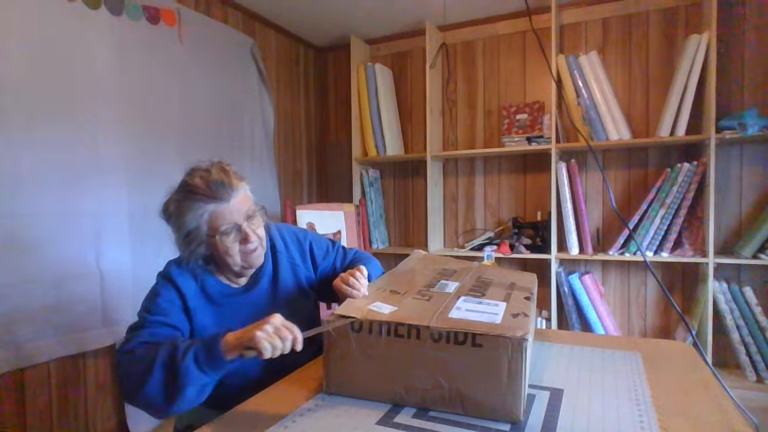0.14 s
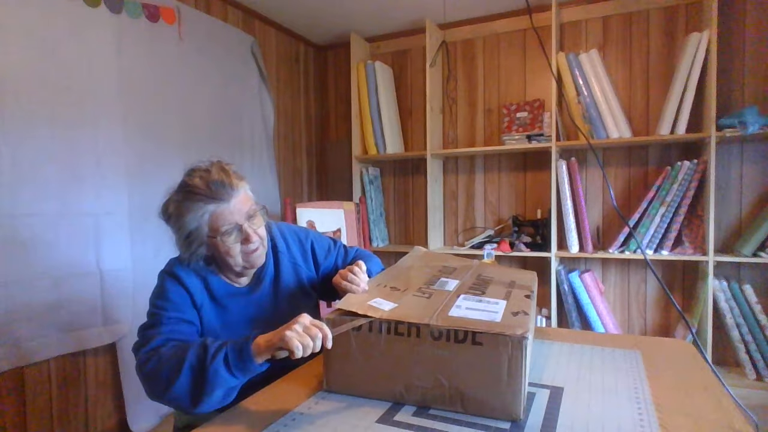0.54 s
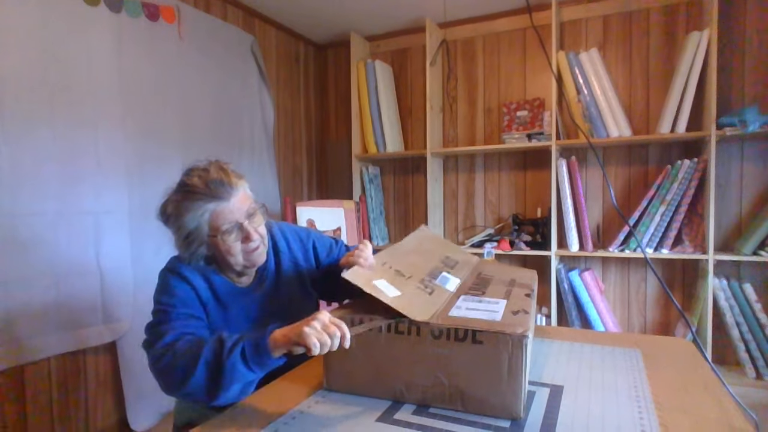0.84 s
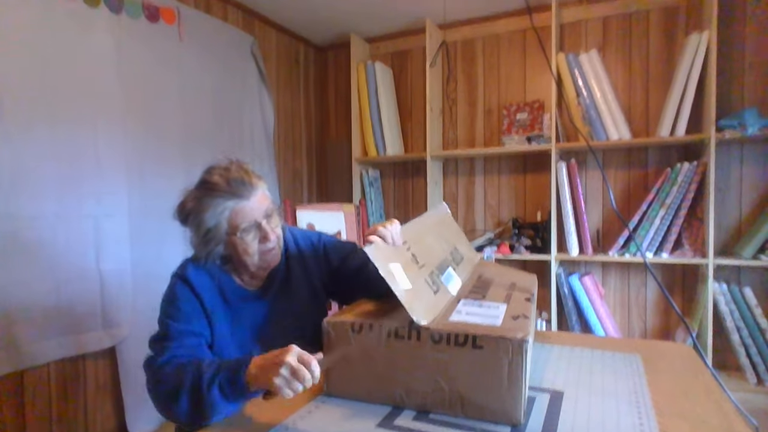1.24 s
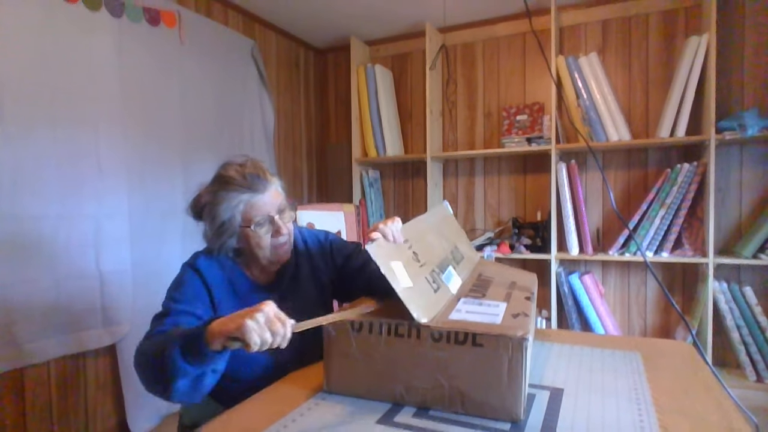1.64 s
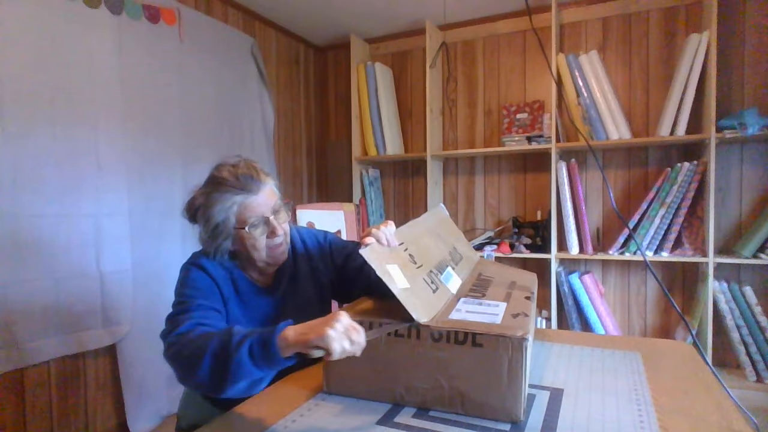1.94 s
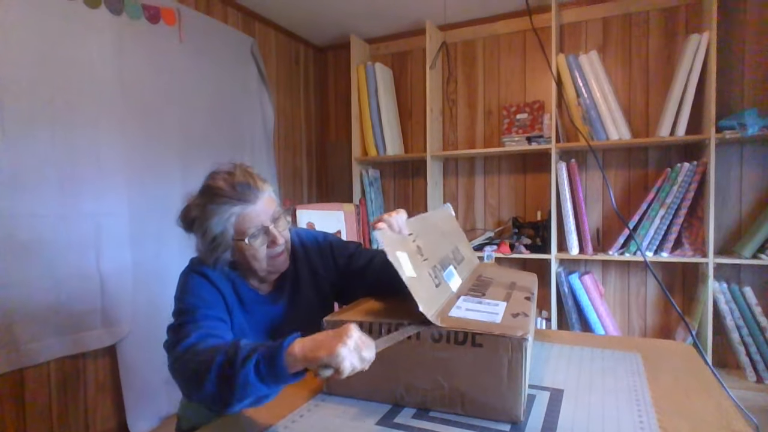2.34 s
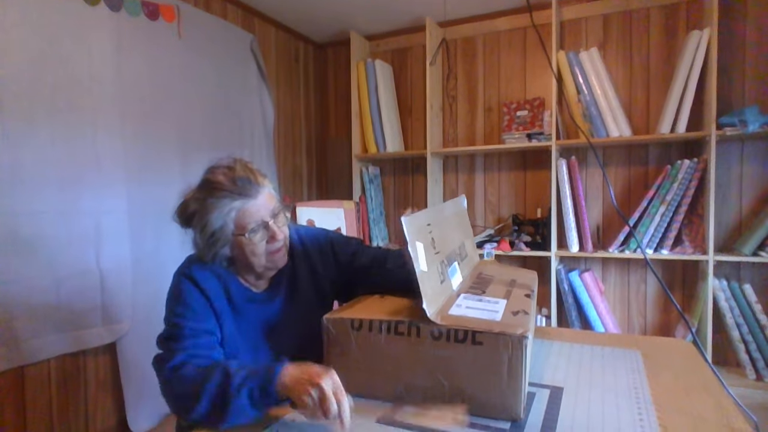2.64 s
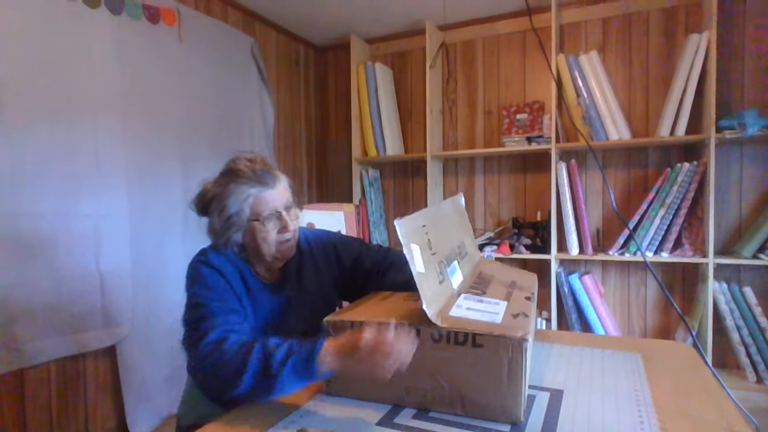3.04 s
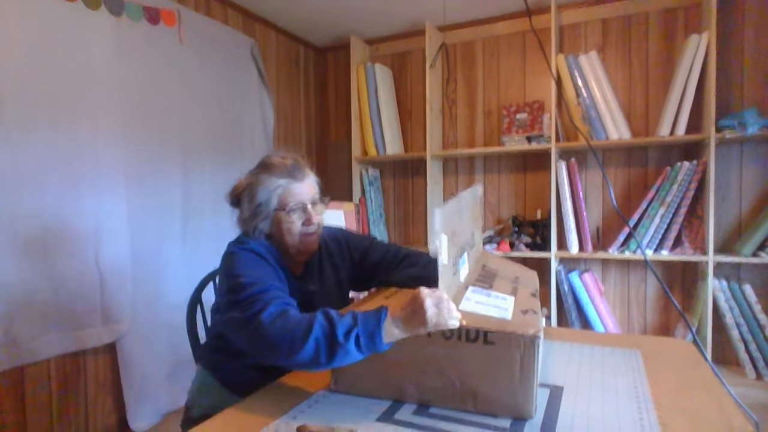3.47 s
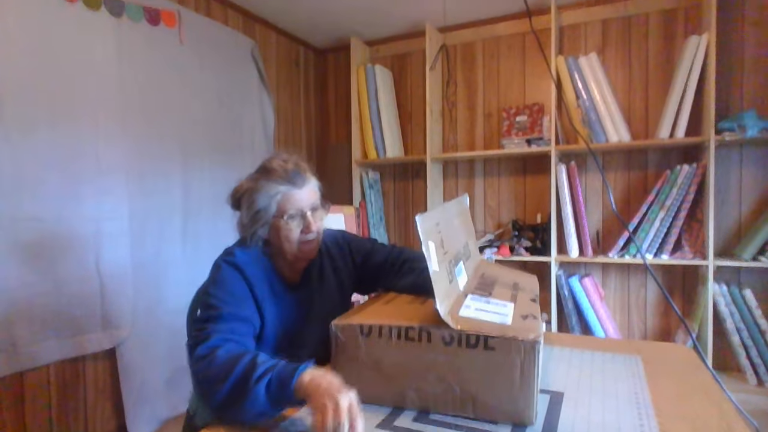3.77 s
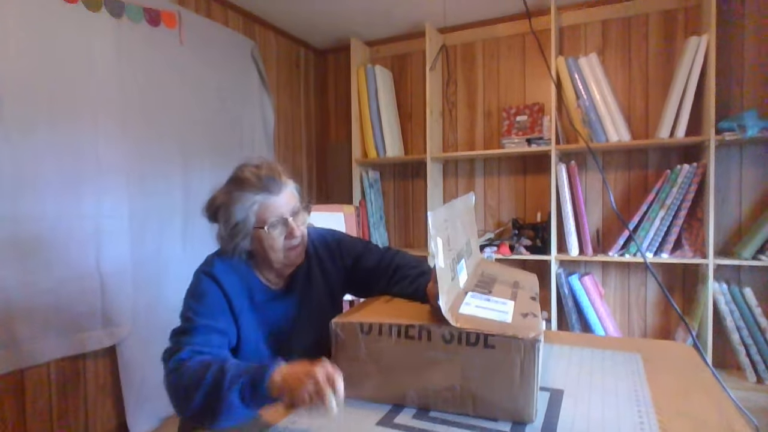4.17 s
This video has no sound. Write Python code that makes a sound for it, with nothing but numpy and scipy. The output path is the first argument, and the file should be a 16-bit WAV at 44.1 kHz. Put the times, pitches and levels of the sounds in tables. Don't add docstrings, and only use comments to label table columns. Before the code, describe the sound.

Close stereo microphones on a desk in a small panelled room. A blade rasps under tape on a hollow cardboard box, with fibres snapping most densely around one second. After a quieter spell the flap slaps loose just past two seconds. A sleeve brushes the desk, a knife drops and bounces with a brief metallic ring, then cloth and cardboard rub to the end.

```python
import sys
import numpy as np
from scipy import signal
from scipy.fft import rfft, irfft
from scipy.io import wavfile
from scipy.ndimage import uniform_filter1d

SR = 44100
rng = np.random.default_rng(int(sys.argv[2]) if len(sys.argv) > 2 else 0)


def waveform_to_disk(signal):
    frames = np.transpose(np.atleast_2d(signal))
    scaled = np.clip(frames, -1, 1) * 32767
    samples = np.round(scaled).astype(np.int16)
    wavfile.write(sys.argv[1], SR, samples)


def gain_from_decibels(decibels):
    exponent = np.asarray(decibels, float) / 20
    return 10 ** exponent


N = 189833

# frequency [Hz], density [dB per Hz].
AIR_COLOUR = [(59, 9), (100, -0.5), (437, 1), (600, -25), (1200, -22), (2920, -14), (15900, -12.5),
              (16500, -26)]
# frequency [Hz], likeness [-1 to 1].
LIKENESS = [(60, 0.99), (150, 0.86), (380, 1), (600, 0.92), (950, 0.9), (2380, 0.41), (5980, 0.65),
            (15000, 0.42)]
# frequency [Hz], lead [radians].
LEFT_LEAD = [(0, 0.96), (5510, 0), (6890, 1.06), (10400, 1.3), (12200, 1.6), (16300, 0.78), (16500, 0)]
# frequency [Hz], t60 [s].
ROOM_T60 = [(100, 0.57), (500, 0.4), (1500, 0.46), (4000, 0.31), (12000, 0.17)]
# time [s], swing [full scale], rate [Hz].
ROCKING = [(0, .012, 6.1), (.6, .008, 6.15), (1, .022, 6.15), (1.25, .036, 5.85), (1.8, .02, 5.85),
           (2.1, .003, 5.4), (2.45, .005, 5.3), (2.75, .016, 5.55), (3.1, .006, 5.55), (3.6, .026, 5.6),
           (4, .036, 5.65), (4.31, .012, 4.9)]
# frequency [Hz], density [dB per Hz].
RUMBLE_COLOUR = [(7.1, -19), (12, 4), (19, 1.5), (33, -8), (55, -1.5), (81, -62), (140, -10.5), (290, -120)]
# start [s], level [dB].
JOLTS = [
    (0.0, -43.5),
    (.72, -43),
    (2.17, -50),
    (2.76, -33.5),
    (3.52, -46.5),
    (3.88, -46),
]

# frequency [Hz], level [dB], t60 [s].
PANELS = [(130.3, -16, 0.95), (225, -23, 0.08), (334, -13, 0.86), (440, -30, 0.49), (498, -41, 0.37),
          (615, -49, 0.16), (815, -30, 0.25), (840, -42, 0.85), (980, -42, 0.35), (1350, -26, 0.61),
          (1610, -27, 0.3), (1616, 6.5, 0.16)]
# start [s], peak [dB], main ring [Hz], hardness [1], t60 [s].
KNOCKS = [(.281, -32, 153, 0.79, 0.29), (0.361, -31, 313, 0.74, 0.17), (.388, -23.5, 562, 0.9, 0.15),
          (.405, -27, 197, 0.61, 0.15), (0.434, -28.5, 480, 0.56, 0.12), (0.661, -42, 493, 0.46, .06),
          (.706, -23, 498, 0.7, 0.23), (0.7359, -21, 438, 1.24, 0.19), (.762, -32, 430, .6, 0.11),
          (.795, -28.5, 403, 0.68, 0.11), (1.09, -31, 454, 1.66, 0.18), (1.3667, -28, 478, 0.93, 0.091),
          (1.367, -29, 162, 0.28, 0.24), (1.376, -28, 198, 0.1, 0.16), (1.555, -43, 420, 1, 0.074),
          (1.596, -31.5, 720, 0.81, 0.062), (1.872, -33.5, 147, 0.49, 0.2),
          (1.873, -35.5, 482, 0.61, 0.099), (2.1786, -12, 478, 0.6, 0.09), (2.184, -22, 136, 0.7, 0.077),
          (2.7696, -23, 328, 0.85, 0.045), (2.772, -29.5, 146, 0.49, 0.2), (2.794, -27, 200, .5, 0.079),
          (2.834, -41, 290, 0.49, 0.059), (2.909, -11, 553, 1.2, 0.029), (2.915, -19, 980, 1.201, 0.18),
          (2.938, -14, 670, 1.52, 0.11), (2.951, -18, 720, 0.83, 0.21), (2.967, -20.5, 980, 1.1, 0.17),
          (2.989, -22, 334, 0.93, 0.23), (3.016, -24, 748, 0.6, 0.22), (3.33, -40, 206, 0.38, 0.13),
          (3.245, -38.5, 450, 0.47, 0.098), (3.66, -45, 303, 0.42, 0.12), (3.866, -26, 130.6, 0.61, 0.18),
          (3.868, -21, 480, 0.5, 0.07)]
# frequency [Hz], level [dB], t60 [s].
FLAP_MODES = [(215.5, -2.5, 0.24), (421.6, -11.5, 0.27), (713, -13, 0.13), (1094, -6.5, 0.17),
              (1385, -7, 0.12), (1917, -4.5, 0.12), (2520, -3.5, 0.13), (474, -10, 0.25), (3180, -13, 0.18),
              (1740, -13.5, 0.16), (2708, -19, 0.2)]
# start [s], peak [dB], length of push [s].
SLAPS = [
    (2.17875, 0, .00005),
    (2.1792, -2, .00008),
    (2.1856, -11, .0001),
    (2.9395, -13, .00012),
    (2.9517, -11, .00012),
]

# frequency [Hz], level [dB], t60 [s].
DESK_MODES = [(212, -11, 0.13), (134.3, -9, 0.15), (478, -6, 0.18), (650, 0, 0.17), (720, -2, 0.2),
              (758, -5, 0.2), (851, -5, 0.22), (979, -1.5, 0.22), (1106, -7, 0.2), (1224, -4, 0.21),
              (1323, -4, 0.1), (1620, -2, 0.13), (1737, -7.5, 0.1), (2040, -14, 0.083)]
# start [s], level [dB].
LANDINGS = [
    (2.9105, -30),
    (2.939, -28.5),
    (2.952, -27),
    (2.968, -29),
    (2.99, -31),
    (3.017, -39.5),
    (3.069, -44),
    (3.088, -46.5),
]
# start [s], clack peak [dB], high ring [dB], low rings [dB].
BOUNCES = [(2.9102, -1.5, -40, -40), (2.916, -12, -40, -40), (2.9393, -12, -49, -17),
           (2.9515, -12.5, -39, -40), (2.9892, -10, -22, -28), (2.9938, -16, -18, -20),
           (3.0102, -31, 4, -24), (3.069, -23, -25, -16), (3.087, -21.5, -14, -2), (3.1156, -32, -25, -2),
           (3.134, -25, -31, -12), (3.15, -33, -17, -14)]
# frequency [Hz], level [dB], t60 [s].
BLADE_MODES = [(12200, -11, .11), (12270, -16, .08), (5410, -14, .11), (5480, -16, .09), (3634, -11, .025),
               (8900, -20, .04), (7300, -24, .05)]

# frequency [Hz], density [dB per Hz].
HISS_COLOUR = [(2060, -48), (3500, -9.5), (4780, -7), (7250, -3.5), (9660, -4.5), (12900, -3.5),
               (15500, -4.5)]
# frequency [Hz], density [dB per Hz].
RASP_COLOUR = [(1060, -12), (1800, -2), (2890, -1), (3790, -2.5), (5000, -2.5), (6500, -9.5), (11000, -120)]
# frequency [Hz], density [dB per Hz].
BOARD_COLOUR = [(260, -44), (450, -1.5), (531, -5), (740, -2), (2200, -6.5), (2860, -17), (4840, -120)]
# frequency [Hz], density [dB per Hz].
HOLLOW_COLOUR = [(53, -89), (90, -16), (140, -10.5), (388, -11.5), (435, -2.5), (560, -16.5), (730, -52),
                 (1230, -120)]
# time [s], grittiness [0-1].
GRITTINESS = [(0, 0.38), (.35, 0.35), (.45, 0.07), (.72, 0.75), (.8, 0.1), (.95, 0.47), (1.05, 0.4),
              (1.12, 0.07), (1.9, 0.21), (2.4, 0.7), (2.47, 0.7), (2.56, 0.13), (2.7, 0.06), (3.3, 0.37),
              (3.45, 0.5), (3.6, 0.01), (4.31, 0.49)]
# time [s], depth [0-1].
ECHO_DEPTH = [(0, .3), (.05, .5), (.28, .45), (.36, .15), (.7, .2), (.9, .25), (.96, .45), (1.09, .5),
              (1.14, .1), (2.1, .1), (2.43, .3), (2.55, 0), (3.3, .1), (3.45, .25), (3.6, 0), (4.31, .1)]
# start [s], fullest [s], end [s], hiss [dB], rasp over hiss [dB].
CUTS = [(-.05, .06, 0.27, -42.5, -11), (0, .22, 0.5, -39.5, -12.5), (.4, .47, 0.55, -48, -2),
        (.36, .42, 0.49, -35.5, -4), (.58, .69, .72, -52.5, -3.5), (.69, .743, 0.92, -29, -7),
        (.88, .95, 1.03, -31, -9), (.92, 1.065, 1.125, -30, -3), (1.08, 1.18, 1.47, -44, -8),
        (1.225, 1.24, 1.29, -50.5, 7.5), (1.28, 1.31, 1.43, -48, -18), (1.42, 1.5, 1.66, -61, -3),
        (1.55, 1.592, 1.632, -45.5, -8.5), (1.86, 1.92, 1.955, -44, -12), (1.95, 2.03, 2.17, -46, -7.5),
        (2.146, 2.149, 2.156, -41, -15), (2.168, 2.173, 2.178, -39, -20), (.855, .858, .862, -40, -10),
        (2.354, 2.357, 2.47, -49, -5), (2.36, 2.46, 2.56, -42, -3.5)]
# start [s], fullest [s], end [s], hiss [dB], rasp over hiss [dB].
SWEEPS = [
    (2.468, 2.756, 3.08, -28.5, -13),
    (3.002, 3.144, 3.33, -49, -6.5),
    (3.226, 3.28, 3.36, -38, -10),
    (3.23, 3.436, 3.63, -32.5, -10),
    (3.569, 3.578, 3.674, -37, -9),
    (3.62, 3.86, 4.071, -30, -6.5),
    (3.94, 4.12, 4.594, -44.5, -11),
    (4.243, 4.274, 4.36, -45, -18),
]
# start [s], fullest [s], end [s], board [dB], hollow over board [dB].
SHOVES = [(-.01, .05, 0.32, -49.5, 5.5), (.08, .3, 0.56, -46.5, 7.5), (.37, .43, 0.53, -41.5, 7),
          (.62, .7, 0.73, -51, 8.5), (.69, .735, 0.89, -43.5, 6), (.95, 1.07, 1.14, -37.5, -35),
          (1.15, 1.3, 1.35, -54, 5), (1.54, 1.6, 1.735, -57, 9.5), (1.95, 2.01, 2.15, -59, -3),
          (2.36, 2.47, 2.7, -54.5, 8), (3.0, 3.08, 3.24, -43, 5), (1.365, 1.39, 1.5, -51, 0),
          (3.2, 3.26, 3.32, -55, 14), (3.28, 3.47, 3.683, -44.5, 7), (3.66, 3.74, 3.83, -46.5, 5.5),
          (3.88, 3.97, 4.05, -45, 7), (4.05, 4.15, 4.4, -62.5, 9.5)]
# start [s], tape [dB], board [dB], hollow over board [dB], t60 [s].
SHIVERS = [(0.387, -32, -45, 10, 0.064), (1.367, -53, -51, -0.5, 0.11), (1.87, -42.5, -59, 20.5, 0.17),
           (1.948, -36, -40.5, 3, 0.22), (2.144, -43, -46.5, -14, 0.094), (2.182, -26, -39, 5, 0.14),
           (2.773, -36.5, -41, 11.5, 0.19), (2.915, -19.5, -31, 1, 0.031), (2.937, -27.5, -20.5, -5, 0.094),
           (2.987, -32, -31, 6, 0.096), (3.865, -32.5, -53, 18, 0.17)]
# fullest [s], rise [s], fall [s], level [dB], pitch [Hz].
WHISTLES = [(3.45, .1, .07, -36, 7400), (3.41, .08, .07, -42, 5150), (2.452, .03, .023, -56, 2700),
            (2.44, 0.022, .03, -50, 4900), (2.485, .015, .035, -43, 6800), (1.885, 0.018, 0.13, -50, 3170),
            (1.875, .01, 0.032, -47.5, 6400), (1.506, .012, .013, -59, 3900),
            (1.462, .012, .03, -57, 12500), (1.312, .02, .02, -48, 12500), (3.59, 0.023, .03, -43.5, 6000),
            (2.76, .12, .08, -40, 3000), (2.2, 0.13, .07, -57, 1130), (2.84, .04, .03, -46, 3300),
            (1.06, .06, .04, -34.5, 2390), (1.055, .06, .04, -36.5, 3140), (.05, 0.027, .05, -52, 1020),
            (1.0, .04, 0.038, -40, 1630), (1.08, .05, .03, -39, 1160), (1.957, .007, .02, -45, 3900),
            (.17, .13, .15, -59.5, 3770), (3.98, 0.0087, .012, -41, 1640), (3.979, .008, 0.013, -36, 5400),
            (2.0, .04, .1, -52, 3120), (4.15, .05, .05, -56, 7000), (.6, .06, .05, -60, 1500)]

# start [s], peak [dB], main ring [Hz], share of wide crack
SNAPS = [(0.285, -25, 5100, 0.7), (.0145, -37, 9500, 0.5), (.391, -7, 4360, 0.6), (0.398, -21, 5560, 0.4),
         (.626, -32, 4000, 0.4), (0.6654, -21.5, 8600, 0.6), (.679, -29, 14000, .7),
         (.6995, -18, 7240, 0.65), (.707, -18, 4870, 0.68), (.737, -6, 12000, 0.7),
         (0.7533, -10, 5450, 0.45), (.758, -7, 12900, .5), (.794, -23, 7500, 0.8), (.8232, -6, 5000, 0.7),
         (0.8253, -12.5, 10000, .5), (0.8504, -4, 5800, 0.7), (.866, -12, 12640, 0.72),
         (.883, -18, 5600, 0.8), (0.8987, -9, 2640, 0.65), (0.9153, -16, 5960, .8),
         (0.9192, -7, 11030, 0.7), (0.986, -11, 12800, 0.49), (1.0456, -8, 2520, 0.6),
         (1.0764, -12, 2260, 0.35), (1.2354, -27, 2470, 0.62), (1.241, -22.5, 4440, 0.5),
         (1.3135, -23, 12300, 0.5), (1.322, -27, 12100, 0.4), (1.366, -28, 6000, 0.56),
         (1.5965, -22.5, 5060, 0.74), (1.875, -23, 8340, 0.4), (1.882, -19, 12000, 0.5),
         (1.887, -26, 9000, .7), (2.144, -13, 2310, 0.55), (2.1514, -24, 3240, 0.61),
         (2.157, -13, 12500, 0.7), (2.1648, -3.5, 7500, 0.55), (2.1786, -4, 3170, 0.7),
         (2.1844, -9, 3420, 0.6), (2.194, -18, 5000, 0.7), (2.22, -27, 4900, 0.65),
         (2.3563, -26, 13750, .85), (2.37, -25, 2650, 0.65), (2.375, -35, 5000, 0.48),
         (2.386, -31, 7960, .7), (2.391, -32, 13000, .6), (3.9804, -20, 4500, 0.33),
         (3.976, -23, 6580, 0.37), (4.1744, -25, 6602, 0.61), (4.231, -20, 7302, 0.53),
         (4.2368, -20, 13000, 0.59), (4.2436, -18.5, 5616, 0.6), (4.263, -21, 7400, 0.6)]


def evened(x):
    return x / np.sqrt(np.mean(x ** 2) + 1e-20)


def read(points, hz):
    f, value = np.transpose(points)
    return np.interp(np.log(hz + 1), np.log(f + 1), value)


def curves(rows):
    s, *columns = np.transpose(rows)
    return [np.interp(np.arange(N) / SR, s, column) for column in columns]


def add(mix, s, sound):
    part = mix[..., round(s * SR):][..., :sound.shape[-1]]
    part += sound[..., :part.shape[-1]]


def filtered(x, order, hz, kind="low"):
    return signal.lfilter(*signal.butter(order, hz, kind, fs=SR), x)


def ring(modes, t):
    return sum(gain_from_decibels(db - 60 * t / t60) * np.sin(2 * np.pi * hz * t) for hz, db, t60 in modes)


def noise(colour, patchy_db, size=512):
    frames, hz = N * 4 // size + 5, np.fft.rfftfreq(size, 1 / SR)
    a, b, c, d, patches = rng.standard_normal((frames, len(hz), 5)).T
    patches = uniform_filter1d(patches, size=7, axis=0)
    patches = evened(uniform_filter1d(patches, size=12, axis=1))
    same = np.clip(read(LIKENESS, hz), -1, 1)[:, None]
    left = a + 1j * b
    right = same * left + np.sqrt(1 - same ** 2) * (c + 1j * d)
    z = np.array([left * np.exp(1j * read(LEFT_LEAD, hz))[:, None], right])
    z *= gain_from_decibels(read(colour, hz)[:, None] + patchy_db * patches)
    return evened(signal.istft(z, nperseg=size, noverlap=size - size // 4)[1][:, :N])


def grit(per_s, spread_db, fade_s):
    size_db = spread_db * np.minimum(rng.exponential(1, N), 4)
    slips = gain_from_decibels(size_db) * (rng.random(N) < per_s / SR)
    return evened(signal.lfilter([1], [1, -np.exp(-1 / (fade_s * SR))], slips))


def strokes(rows):
    start, full, end, db, more_db = np.transpose(rows)[..., None]
    t = np.arange(0, N, 16) / SR
    away = np.where(t < full, (full - t) / (full - start), (t - full) / (end - full))
    swell = abs(np.cos(np.pi / 2 * np.clip(away, 0, 1))) ** 1.79
    power = (gain_from_decibels(db) * swell) ** 2
    return [np.repeat(p.sum(0), 16)[:N] for p in (power, power * gain_from_decibels(2 * more_db))]


def dying(s, db, t60, rise_s):
    s, db, t60 = (np.reshape(x, (-1, 1)) for x in (s, db, t60))
    since = np.maximum(np.arange(0, N, 16) / SR - s, 0)
    gain = (1 - np.exp(-since / rise_s)) * gain_from_decibels(db - 60 * since / t60)
    return np.repeat((gain ** 2).sum(0), 16)[:N]


def room_air():
    return gain_from_decibels(-57) * noise(AIR_COLOUR, 0.4)


def stand():
    swing, hz = curves(ROCKING)
    turns = np.cumsum(hz) / SR - np.array([[-.04], [.04]])
    rock = swing * (np.sin(2 * np.pi * turns) - 0.095 * np.cos(4 * np.pi * turns))
    s, db = np.transpose(JOLTS)
    calm_db = -50.5
    shake = np.sqrt(gain_from_decibels(2 * calm_db) + dying(s, db, t60=1.8, rise_s=0.019))
    return rock * gain_from_decibels([[-1.5], [0]]) + shake * noise(RUMBLE_COLOUR, 0.59, size=8192)


def room(x):
    taps = np.zeros((2, SR // 2))
    at = np.arange(150, SR // 2 - 20, 20) + rng.integers(0, 20, (2, (SR // 2 - 151) // 20))
    np.put_along_axis(taps, at, rng.choice([-1., 1.], at.shape), 1)
    hz, t, z = signal.stft(taps, SR, nperseg=256)
    apart = np.clip(hz / 800, 0, 1)[:, None]
    z[1] = np.sqrt(1 - apart ** 2) * z[0] + apart * z[1]
    tail = signal.istft(z * gain_from_decibels(-60 * t / read(ROOM_T60, hz)[:, None]), SR, nperseg=256)[1]
    return signal.fftconvolve(x.mean(0)[None], tail / np.linalg.norm(tail[0]), axes=1)[:, :N]


def desk_echo(x, depth):
    late = np.roll(x, round(.000385 * SR), axis=-1)
    late = .7 * late + .3 * np.roll(late, -1, axis=-1)
    return (x + depth * late) / np.sqrt(1 + depth ** 2)


def knocks():
    out, t = np.zeros(N), np.arange(16000) / SR
    draws = rng.standard_normal((len(KNOCKS), len(t) + len(PANELS)))
    for (s, db, hz, hard, t60), draw in zip(KNOCKS, draws):
        edge = np.clip(1000 * hard, 200, 9000)
        panels = []
        for (f, panel_db, panel_t60), chance in zip(PANELS, draw[len(t):]):
            level = panel_db - 6 * (f / edge) ** 3.6 + 0.32 * chance
            panels.append((f, level, min(panel_t60, 2.07 * t60) / (1 + f / 1500)))
        rattle = evened(filtered(draw[:len(t)], 2, [130, edge], "band")) * gain_from_decibels(-60 * t / t60)
        body = ring([(hz, -6.5 * hard, t60 / (1 + hz / 900))], t) + .5 * ring(panels, t)
        add(out, s, gain_from_decibels(db) * (1 - np.exp(-t / 0.0011)) * (body + 0.5 * rattle))
    return out


def flap_rap():
    out, t = np.zeros(N), np.arange(16000) / SR
    chatter = uniform_filter1d(rng.standard_normal((len(FLAP_MODES), len(t))), size=220)
    buzz = 1 + 0.3 * evened(chatter)
    rap = sum(b * ring([(hz, db, min(t60, .3))], t) for b, (hz, db, t60) in zip(buzz, FLAP_MODES))
    add(out, 1.949, -gain_from_decibels(-27.5) * rap)
    return out


def slaps():
    out = np.zeros(N)
    for s, db, push_s in SLAPS:
        u = np.arange(400) / SR / push_s
        add(out, s, -gain_from_decibels(db) * u * (2 - u) * np.exp(1 - u) * 0.53)
    return out


def desk():
    out, t = np.zeros(N), np.arange(14000) / SR
    for (s, db), spot in zip(LANDINGS, rng.standard_normal((len(LANDINGS), len(DESK_MODES)))):
        modes = [(hz * (1 + 0.0151 * shift), mode_db + 2.6 * level, t60)
                 for (hz, mode_db, t60), level, shift in zip(DESK_MODES, spot, spot[::-1])]
        twins = [(hz * (1 + .03), mode_db, 0.72 * t60) for hz, mode_db, t60 in modes]
        add(out, s, gain_from_decibels(db) * (ring(modes, t) + 0.6 * ring(twins, t)))
    return out


def knife():
    out, t = np.zeros((2, N)), np.arange(9000) / SR
    for (s, db, high_db, low_db), draw in zip(BOUNCES, rng.standard_normal((len(BOUNCES), 3, len(t)))):
        clack = filtered(0.5 * draw[0] + 0.64 * draw[1:], 1, [2500, 10000], "band")
        clack = clack * gain_from_decibels(1.0 - 60 * t / 0.0089)
        steel = gain_from_decibels(high_db) * ring(BLADE_MODES[:2], t) + gain_from_decibels(low_db) * ring(BLADE_MODES[2:], t)
        add(out, s, gain_from_decibels(db) * (desk_echo(clack, 0.14) + steel * (1 - np.exp(-t / 0.0021))))
    return out


def whistles():
    out, t = np.zeros((2, N)), np.arange(14000) / SR
    for (full, rise, fall, db, hz), draw in zip(WHISTLES, rng.standard_normal((len(WHISTLES), 3, len(t)))):
        air = filtered(draw[0] + 0.61 * draw[1:], 2, [hz * 0.9, hz * 1.1], "band")
        stroke = np.sin(np.pi / 2 * np.interp(t, [0, rise, rise + fall], [0, 1, 0])) ** 2
        add(out, max(full - rise, 0), gain_from_decibels(db) * stroke * evened(air))
    return out


def efforts():
    s, tape_db, board_db, hollow_db, t60 = np.transpose(SHIVERS)
    box_t60 = 2 * t60
    hiss, rasp = strokes(CUTS + SWEEPS)
    board, hollow = strokes(SHOVES)
    tape = dying(s, tape_db, t60, rise_s=0.00039)
    board = board + rasp * gain_from_decibels(2 * -9.5) + dying(s, board_db, box_t60, rise_s=0.0046)
    hollow = hollow + dying(s, board_db + hollow_db, box_t60, rise_s=0.0065)
    rasp = rasp + tape * gain_from_decibels(2 * -2) + gain_from_decibels(2 * -71)
    return np.sqrt([hiss + tape, rasp, board + gain_from_decibels(2 * -66), hollow])


def rubbing():
    hiss, rasp, board, hollow = efforts()
    echo, gritty = np.clip(curves(ECHO_DEPTH) + curves(GRITTINESS), 0, 1)
    smooth = np.sqrt(1 - gritty ** 2)
    slips = smooth + gritty * grit(per_s=600, spread_db=5, fade_s=.0015)
    jolts = smooth + gritty * grit(per_s=140, spread_db=4, fade_s=.006)
    top = hiss * noise(HISS_COLOUR, 1.47) + rasp * noise(RASP_COLOUR, 1.8)
    low = board * noise(BOARD_COLOUR, 1, size=1024)
    low = low + hollow * gain_from_decibels(-9.0) * noise(HOLLOW_COLOUR, 1.0, size=1024)
    return desk_echo(top * slips, echo) + jolts * low


def snaps():
    events = SNAPS
    out, t = np.zeros((2, N)), np.arange(1500) / SR
    rise = 1 - np.exp(-(t / 0.00036) ** 2)
    for (s, db, hz, wide), draw in zip(events, rng.standard_normal((len(events), 3, len(t)))):
        t60 = 0.0046 * (4000 / hz) ** 0.38
        crack = signal.lfilter([1, -1], [1, -.6], 2.17 * draw[0] + 1.08 * draw[1:]) * gain_from_decibels(-60 * t / t60)
        reach = np.clip(hz * (1 + 10.4 * wide ** 2), 2000, 21000)
        crack = filtered(filtered(crack, 2, reach), 2, 1700, "high")
        cycles = ring([(hz, 0, 14 / hz + 0.0031)], t)
        wide = np.clip(wide, 0, 1)
        snap = rise * (.5 * wide * crack + (1 - wide) * cycles)
        add(out, s, gain_from_decibels(db - 2.5) * snap / abs(snap).max())
    return desk_echo(out, 0.033)


def scene():
    blows = knocks() + flap_rap() + slaps() + desk() + knife() + snaps()
    background = room_air() + stand() + gain_from_decibels(-9.5) * room(blows)
    return background + whistles() + rubbing() + blows


def top_cut(x):
    return signal.sosfilt(signal.butter(12, 16970, fs=SR, output="sos"), x)


def record(dry):
    ceiling, edge_hz, limit_hz = 1.3, 15850, 16950
    dry = ceiling * np.tanh(dry / ceiling)
    hz = np.fft.rfftfreq(N, 1 / SR)
    spectrum = rfft(dry)
    below = irfft(spectrum * (hz <= edge_hz), N)
    top = irfft(spectrum * ((hz > edge_hz) & (hz < limit_hz)), N)
    power = (top ** 2).mean(0)
    quick, slow = (abs(uniform_filter1d(power, size=n)) + 1e-14 for n in (200, 4000))
    sudden = uniform_filter1d(1. * (quick > 6 * slow), size=300)
    return top_cut(below + top * sudden)


dry = scene()
out = record(dry)
waveform_to_disk(out)
```